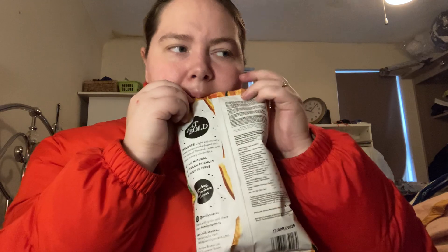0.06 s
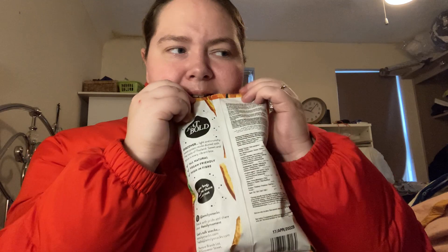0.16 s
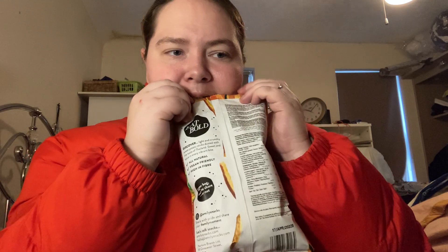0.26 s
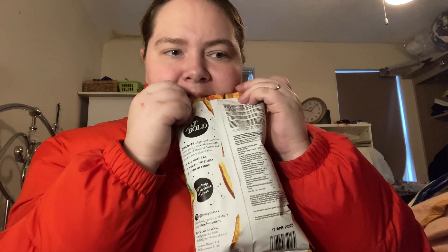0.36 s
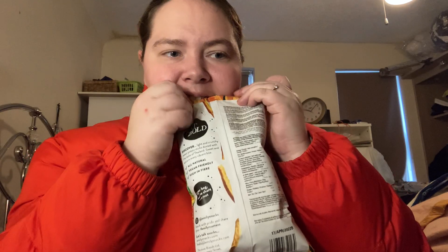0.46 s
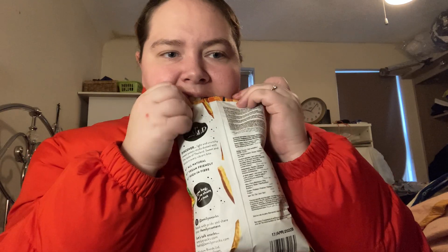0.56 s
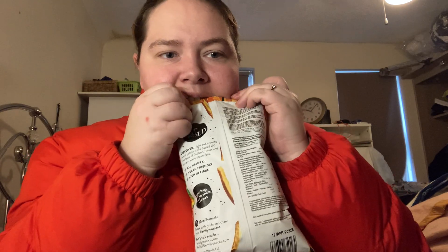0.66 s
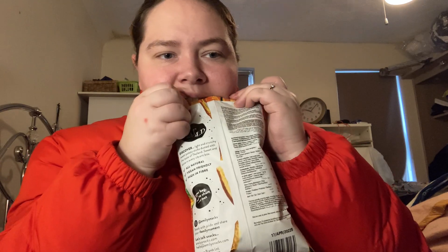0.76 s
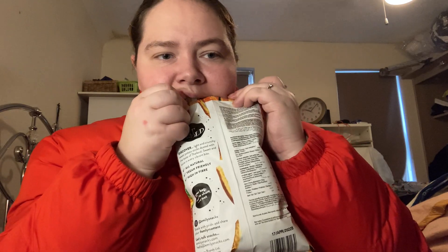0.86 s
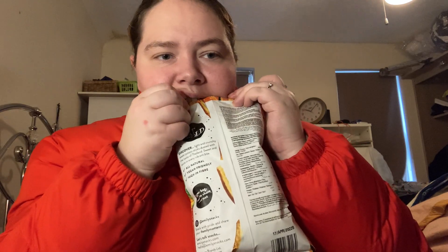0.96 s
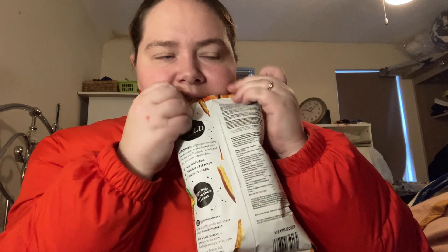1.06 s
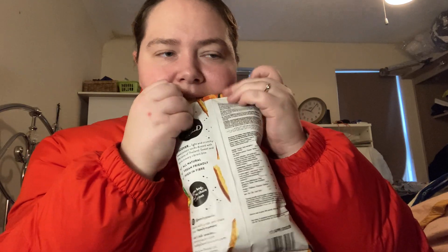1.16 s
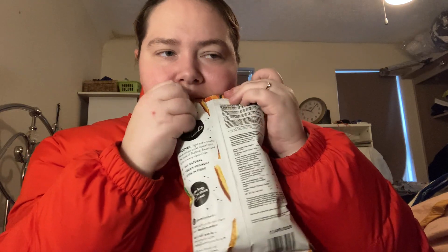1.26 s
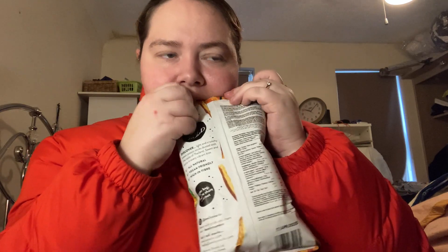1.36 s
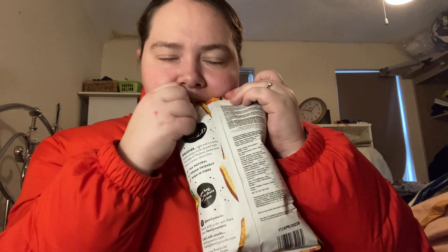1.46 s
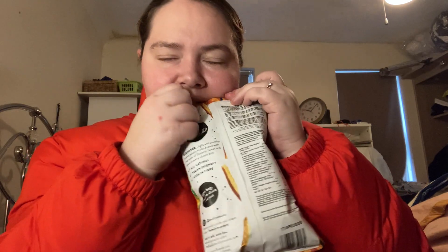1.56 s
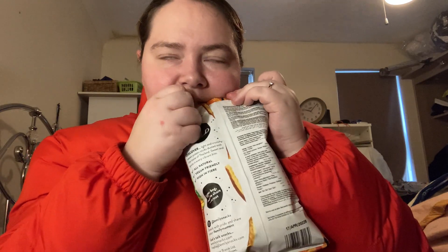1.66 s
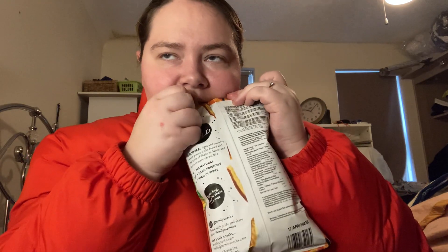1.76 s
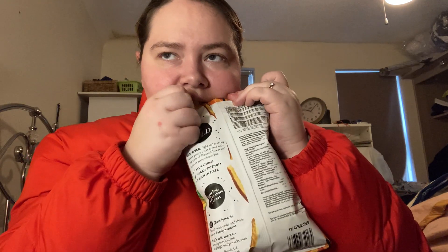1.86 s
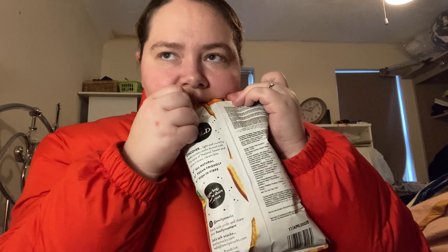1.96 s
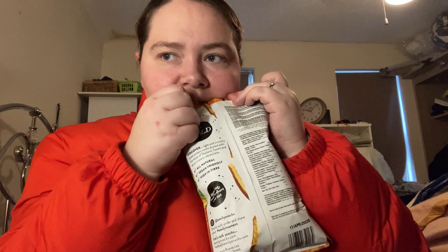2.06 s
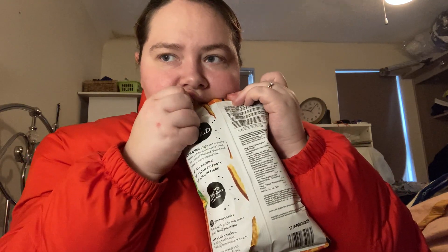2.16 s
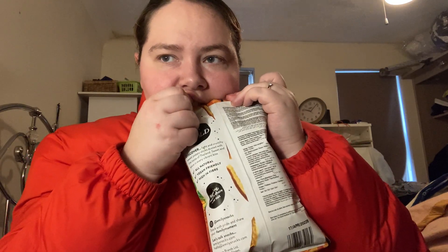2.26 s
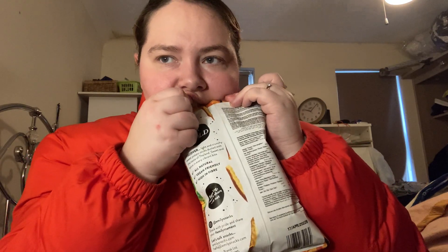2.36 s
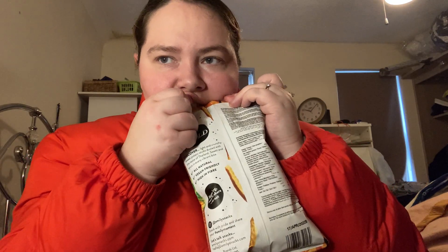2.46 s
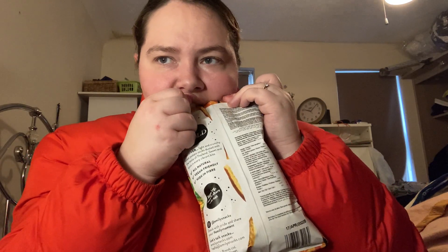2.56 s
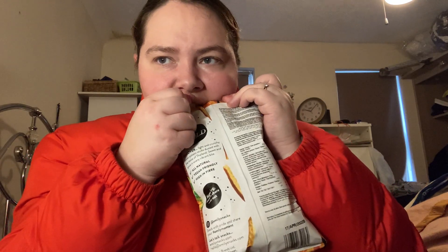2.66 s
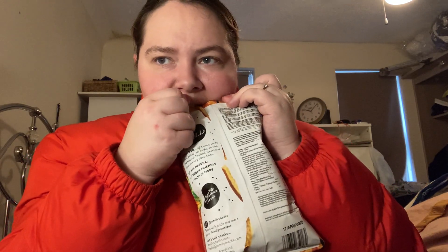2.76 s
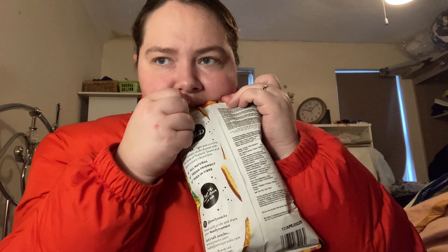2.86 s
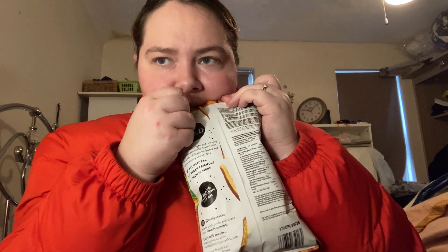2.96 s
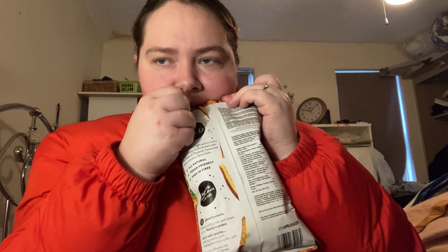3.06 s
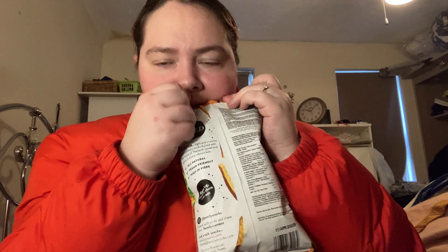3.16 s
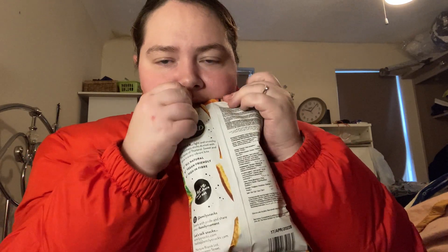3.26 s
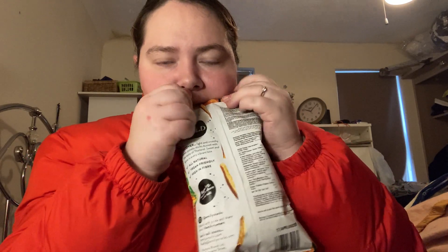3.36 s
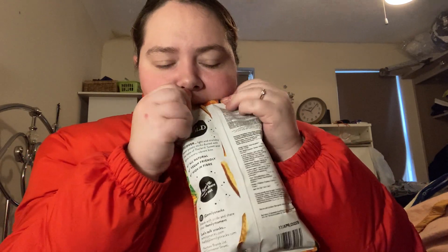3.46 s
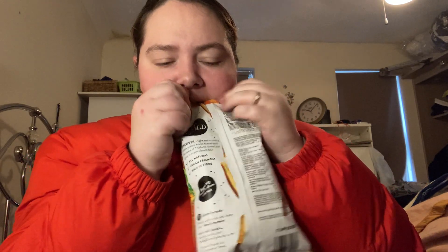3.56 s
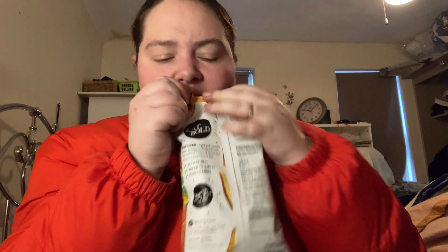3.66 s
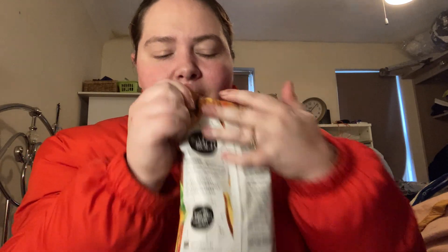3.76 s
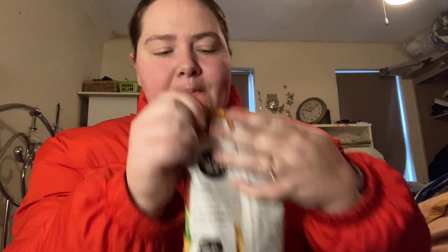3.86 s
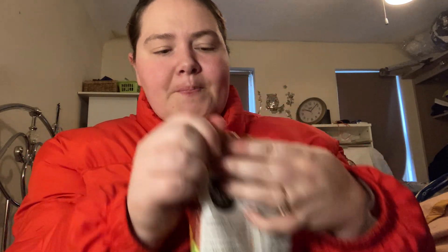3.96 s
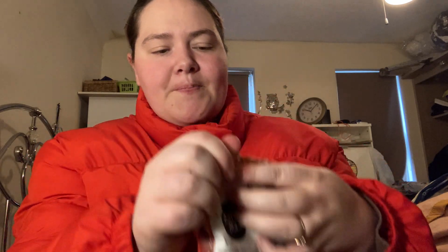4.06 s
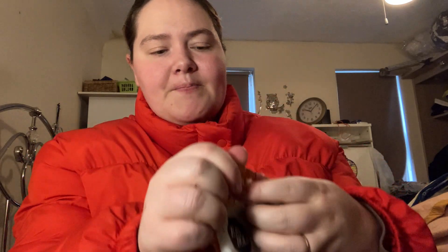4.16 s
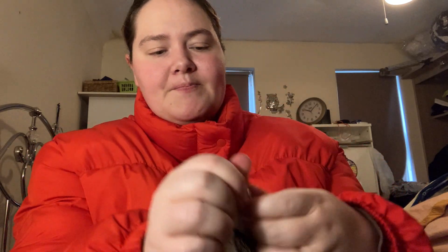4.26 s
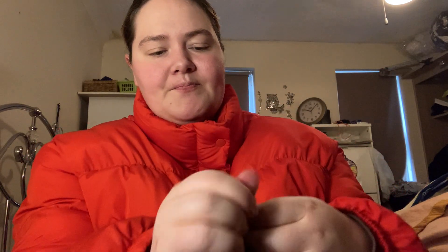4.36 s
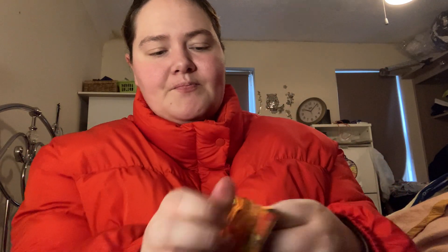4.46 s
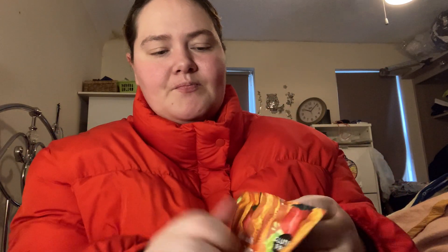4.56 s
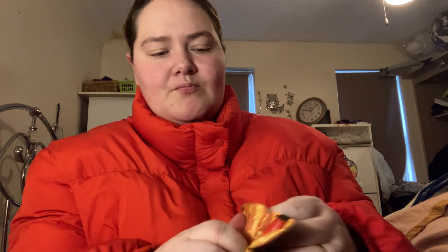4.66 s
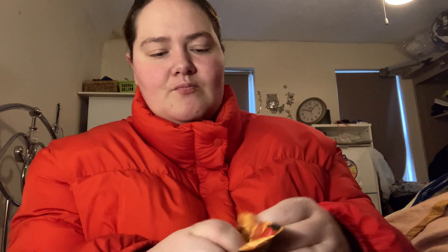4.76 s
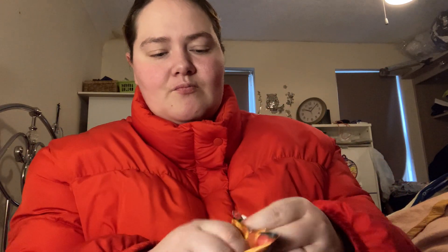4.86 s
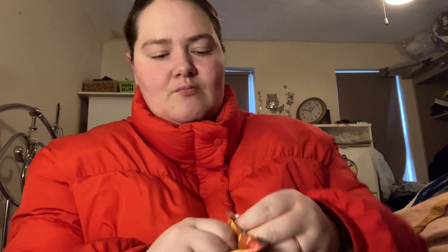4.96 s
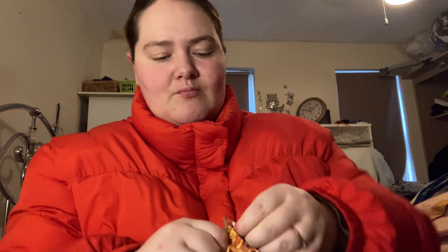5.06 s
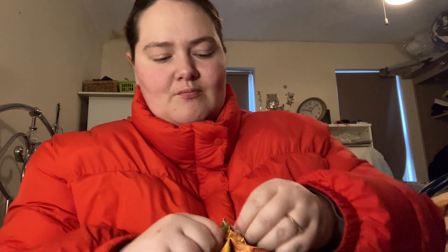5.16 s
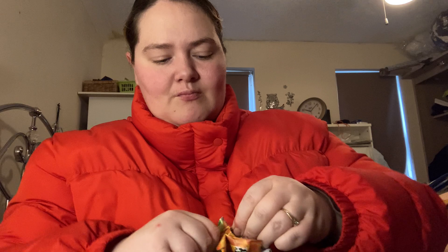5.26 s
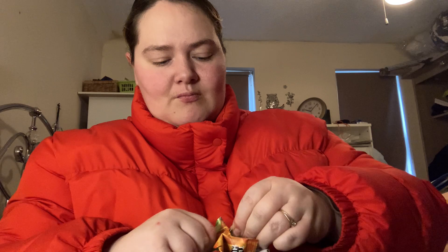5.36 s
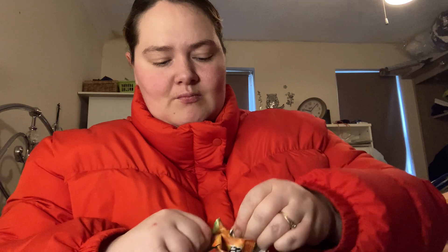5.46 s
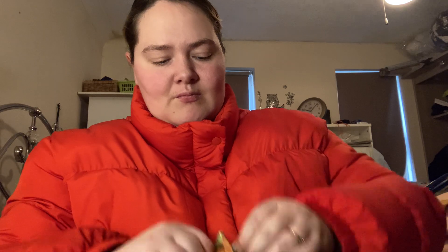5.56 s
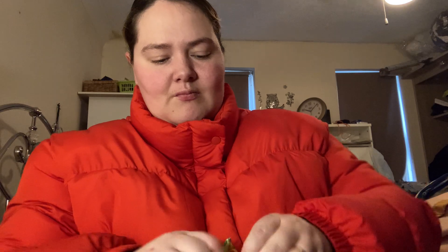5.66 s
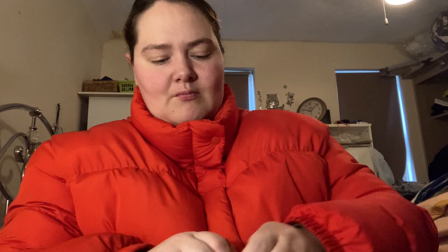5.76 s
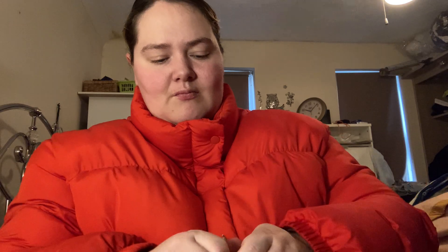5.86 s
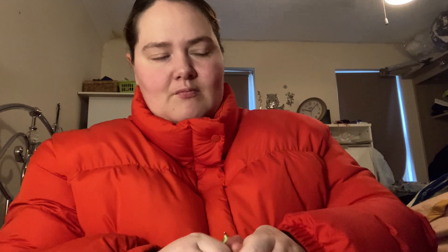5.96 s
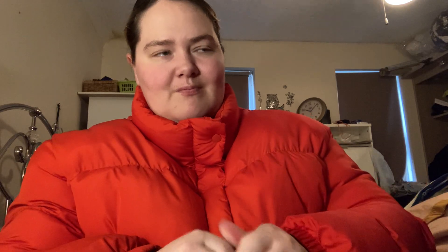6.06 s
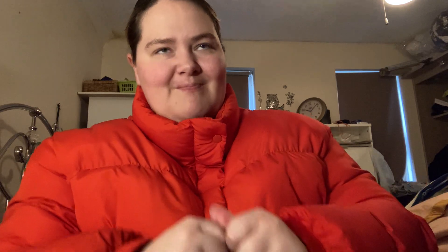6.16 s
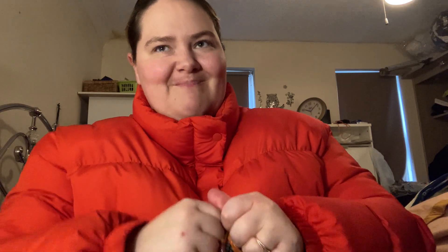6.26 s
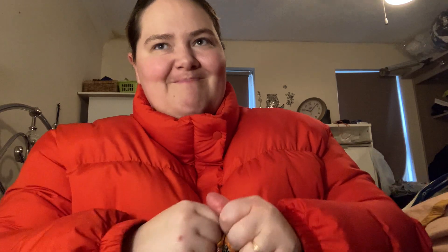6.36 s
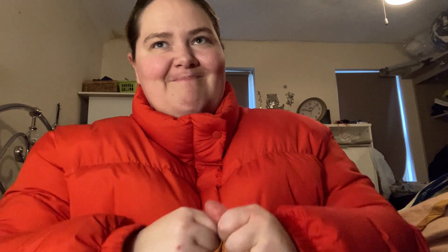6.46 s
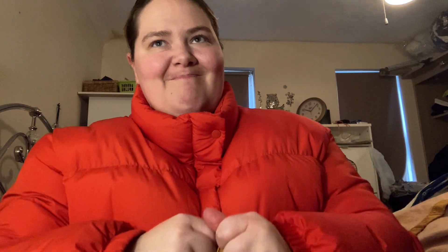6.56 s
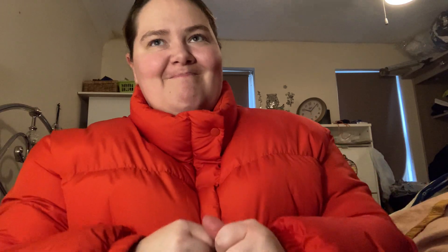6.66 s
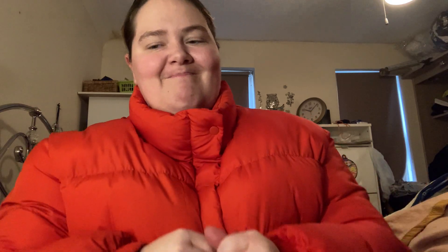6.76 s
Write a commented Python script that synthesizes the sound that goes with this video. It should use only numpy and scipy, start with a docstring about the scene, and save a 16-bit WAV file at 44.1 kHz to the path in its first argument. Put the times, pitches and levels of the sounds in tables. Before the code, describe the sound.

Close to a laptop microphone in a small bedroom, a plastic snack packet held at the mouth gives scattered sharp crackles and light rustle. It falls almost silent for about a second, with only faint ticks, then the crinkling returns and thickens into loud snapping as the hands twist and pull. The bag drums softly low down, over faint rumble and room hum, and the crackling thins at the end.

```python
"""A plastic snack packet crackles in the hands, close to a laptop in a small bedroom.
Creases in its film buckle one by one as damped sines and noise bursts, over a bed of tiny noise grains.
The air-filled bag drums low as damped sines, and decaying noise tails give the answer of the walls.
Two microphone ports colour and phase-shift the sound; shaped noise makes the rumble and faint room hum."""
import sys
import numpy as np
from scipy import signal
from scipy.fft import rfft, irfft, next_fast_len
from scipy.io import wavfile
from scipy.ndimage import map_coordinates

SR = 44100
rng = np.random.default_rng(int(sys.argv[2]) if len(sys.argv) > 2 else 0)


def generate_wav(sig):
    """Save sig (samples, or channels by samples) to the path in sys.argv[1] as 16-bit PCM at SR."""
    pcm = np.round(np.clip(np.atleast_2d(sig).T, -1, 1) * 32767).astype(np.int16)
    wavfile.write(sys.argv[1], SR, pcm)


N = 300782

# Creases that buckle; crack and depth are relative to the peak, and each band adds its own offset:
# start_s, peak_db, pitch_hz, crack_db, depth_db
CREASES = [(0.0024, -24.5, 2050, -10.5, -12.5), (0.0662, -27, 2130, -15.5, -9), (0.116, -47, 1980, -28, -9),
           (0.1419, -34, 1960, -24, -10), (0.2119, -22.5, 2050, -21, -13), (0.2632, -24, 2070, -12, -8.5),
           (0.2746, -36, 2410, -0.5, -10), (0.3202, -32.5, 2500, -7, -3.5), (0.405, -30, 2340, -5, -11.5),
           (0.4195, -44, 2400, -13, -19), (0.4943, -40, 2540, -14, -2), (0.506, -46.5, 2470, 4, -2),
           (0.532, -36.5, 2530, -14, -5.5), (0.5493, -41.5, 2500, -4, 3.5), (0.5801, -33, 2450, -14.5, 3),
           (0.6073, -31, 2370, -13, -12), (0.6267, -35.5, 2440, -17, -10), (0.6545, -30, 2500, -16, -6),
           (0.6817, -26, 2300, -18.5, -8.5), (0.7114, -30.5, 2620, -5.5, -28),
           (0.7963, -21.5, 2180, -17, -24.5), (0.8431, -44, 2520, 11, -5), (0.8699, -32.5, 1940, -20, -3),
           (0.9143, -48, 2470, -23, -25), (1.0727, -41.5, 2020, -27, 5.5), (1.0882, -26.5, 2520, -15.5, -6),
           (1.1118, -24.5, 2000, -13, -7), (1.1343, -32, 1980, -2, -1.5), (1.1742, -35.5, 2460, -7.5, -7.5),
           (1.2101, -36.5, 2420, -7, 1), (1.2414, -18.5, 2430, -9.5, -9.5),
           (1.3194, -34.5, 2600, -9, -31.5), (1.3283, -33.5, 2070, -7.5, -2.5),
           (1.403, -25.5, 2200, -3.5, -7.5), (1.5277, -36, 2580, -39, -7.5),
           (1.5351, -31.5, 2600, -14.5, -31), (1.5571, -28, 2320, -4, -13.5), (1.673, -30, 2210, -1, -9),
           (1.6933, -29, 2690, -15, -10), (1.722, -34.5, 2530, -13, -12), (1.7637, -33.5, 2160, -10.5, -6),
           (1.8233, -41, 1950, -14.5, -0.5), (1.9275, -51.5, 2500, -13, 1.5), (2.007, -48.5, 2480, -21, 6),
           (2.0261, -48, 2280, -31, -3.5), (2.14, -41, 2170, -30, -6.5), (2.2295, -51, 2520, -31, -26),
           (2.3316, -38.5, 2450, -8.5, -2), (2.3491, -33, 2180, -31, -27),
           (2.3978, -20, 2340, -19.5, -32.5), (2.45, -33.5, 2030, -12.5, -5),
           (2.4883, -39.5, 2570, -30, -3), (2.5294, -48, 2600, -29, -33), (2.5713, -48, 2500, -15, -2.5),
           (2.6549, -49.5, 2510, -38, -29), (2.759, -52.5, 2530, -26, -10), (2.772, -59, 2360, -6, -3),
           (2.7915, -48.5, 2440, -21, -8), (2.829, -51, 2480, -30, -32), (2.9126, -54, 1960, -25, 15),
           (2.9307, -29.5, 2250, -13, -8.5), (3.064, -52, 2450, -29, -17), (3.1185, -53, 2400, -36, 1.5),
           (3.1692, -50, 2300, -13.5, 8.5), (3.2052, -27.5, 2460, -27.5, -10),
           (3.256, -31.5, 2640, -21, -9), (3.2815, -25.5, 2010, -13.5, -20), (3.2922, -33, 2040, -8, -2),
           (3.3097, -31.5, 2520, -22, -7.5), (3.3502, -31, 2520, -25, -7.5), (3.3891, -32, 2600, -18, -17),
           (3.4083, -39, 2380, -39, -3.5), (3.472, -31.5, 2490, -5.5, -7.5),
           (3.4897, -35, 2480, -23, -10.5), (3.5471, -29.5, 2680, -22, -6), (3.595, -39, 2590, -23, 1.5),
           (3.6431, -30.5, 2170, -14, -5), (3.6543, -30.5, 2230, -19, -6.5), (3.6727, -25, 2700, -5.5, -8),
           (3.6804, -23, 2060, -28, -26), (3.6919, -27, 2490, -17, -1), (3.7323, -32, 2400, -27, -12.5),
           (3.7698, -23.5, 2420, -12.5, -16), (3.8082, -24, 2480, -16, -7.5),
           (3.8219, -22.5, 2400, -16, -10), (3.8376, -21, 2560, -9, -1), (3.9317, -21, 2570, -13, -12),
           (3.9429, -21.5, 1950, -23, -17), (3.983, -23, 2730, -20.5, -8), (3.9991, -22.5, 2380, -26, -16),
           (4.0296, -22, 2040, -17, -25), (4.093, -27, 2230, -42, -22), (4.1096, -21, 2300, -18, -13),
           (4.136, -26.5, 2250, -40, -13), (4.1629, -21, 2380, -18, -14), (4.2134, -23, 2540, -14.5, -15),
           (4.2241, -14.5, 2280, -13, -27), (4.2391, -15.5, 2660, -15, -13.5),
           (4.2567, -24, 2380, -29, -18), (4.3059, -27.5, 2390, -10, -8.5), (4.3156, -15, 2380, -18.5, -17),
           (4.3488, -21.5, 2450, -12.5, -9), (4.4062, -21, 1930, -13.5, -16),
           (4.4572, -30.5, 2600, -15, -8.5), (4.4732, -23, 2230, -12, -7.5), (4.5191, -30.5, 2060, -8, -3),
           (4.5478, -20, 2540, -13, -11.5), (4.6014, -31, 2390, -3, 4.5), (4.6635, -23, 2600, -15, -3),
           (4.6893, -17, 2220, -12, -18), (4.7015, -20, 3080, -15, -7), (4.7168, -33, 2100, -3, -12),
           (4.7382, -23.5, 2720, -5, -34), (4.7546, -29.5, 1980, -11, -12),
           (4.7743, -21.5, 2500, -14, -19.5), (4.808, -13.5, 2500, -18.5, -23),
           (4.8266, -16, 1930, -16, -32.5), (4.8384, -14.5, 1850, -15, -13), (4.8489, -22, 2700, -4, -12.5),
           (4.8804, -27.5, 2700, -0.5, -20), (4.9008, -18.5, 2840, -7.5, -13),
           (4.9341, -14.5, 2820, -10.5, -13.5), (5.003, -20, 2160, -14, -10.5),
           (5.0447, -29, 2470, -9.5, -10), (5.0595, -21, 2670, -8, -9), (5.0728, -18, 2000, -12, -17.5),
           (5.0849, -19.5, 2640, -12, -15), (5.107, -9, 2710, -16, -16.5), (5.1232, -7, 2850, -14, -30),
           (5.1385, -22.5, 3040, -0.5, -47), (5.1643, -15.5, 2560, -11, -41),
           (5.1933, -17.5, 2540, -23.5, -16), (5.2042, -18, 2620, -31, -16.5),
           (5.2138, -24.5, 2600, -9, -26), (5.2321, -13.5, 2300, -13.5, -19),
           (5.256, -14, 2610, -12.5, -10), (5.2717, -28, 2400, 2.5, -9), (5.2987, -24.5, 2520, -19, -13),
           (5.3342, -25.5, 2380, -10.5, -16), (5.3774, -30, 2480, -16, -10.5),
           (5.4037, -21.5, 2460, -3, -12), (5.4324, -23.5, 2560, -4.5, -13),
           (5.465, -26, 1950, -6.5, -18.5), (5.4971, -15.5, 2960, -19.5, -23),
           (5.5913, -22.5, 2670, -15.5, -26), (5.614, -25, 2430, -26, -11.5), (5.6742, -21, 2530, -12, -13),
           (5.687, -22, 2720, -16, -18), (5.7032, -10.5, 2650, -10.5, -21), (5.75, -24.5, 2290, -4, -4),
           (5.7701, -15.5, 2890, -14, -17), (5.7894, -20.5, 2170, -10, -14.5),
           (5.8055, -16, 2480, -14.5, -14.5), (5.8323, -29, 2000, -5.5, -1),
           (5.8607, -22.5, 2900, -4, -9.5), (5.894, -24, 2940, -20, -9), (5.9513, -22, 2550, -15.5, -14),
           (5.969, -29, 2640, -3.5, -21), (6.0154, -44, 2500, -21, -4.5), (6.036, -24.5, 2400, -11, -30),
           (6.052, -23, 2490, -8.5, -15), (6.087, -23, 2050, -11, -9), (6.097, -21.5, 2060, -6.5, -13),
           (6.129, -26.5, 2620, -8.5, -3), (6.1523, -13.5, 2580, -5, -16), (6.1925, -18, 2010, -25, -17.5),
           (6.2064, -18, 2300, -14, -8), (6.2488, -24, 2630, -8, -8.5), (6.3062, -30.5, 2630, -10.5, -40),
           (6.354, -18, 2660, -15.5, -16.5), (6.4082, -29.5, 2530, -16, -28),
           (6.4195, -24.5, 2800, -8, -22.5), (6.475, -21.5, 2220, -16, -32),
           (6.5051, -25.5, 2020, -16, -24), (6.549, -35, 2460, -10, -18), (6.5923, -32, 2580, -8, -48),
           (6.7121, -21, 2480, -26, -28), (6.7225, -34, 2400, -2, -4), (6.8038, -37, 2820, 3, -2)]


def amp(db):
    """Decibel law: 20 dB is a factor of ten in amplitude."""
    return 10 ** (np.asarray(db) / 20)


def unit(x):
    """Normalization: scale to a root-mean-square of 1 over all channels."""
    return x / np.sqrt(np.mean(x ** 2) + 1e-20)


def along(points, hz):
    """Logarithmic frequency scale: interpolate the value columns of (frequency, value, ..) rows."""
    f, *cols = np.transpose(points)
    return np.array([np.interp(np.log(hz + 1), np.log(f + 1), c) for c in cols])


def filtered(x, response):
    """Linear filtering: multiply the spectrum by a response of frequency."""
    m = next_fast_len(N + SR // 2, real=True)  # half a second of padding
    spectrum = rfft(x, m) * response(np.fft.rfftfreq(m, 1 / SR))
    return irfft(spectrum, m)[..., :N]


def band(x, lo_hz, hi_hz):
    """Band limitation: causal Butterworth band-pass."""
    sos = signal.butter(3, [lo_hz, hi_hz], "band", fs=SR, output="sos")
    return signal.sosfilt(sos, x)


def placed(times, shapes):
    """Superposition: rows of short sounds summed at their start times in seconds."""
    first = np.round(np.asarray(times) * SR).astype(int)
    at = first[:, None] + np.arange(shapes.shape[1])
    return np.bincount(at.ravel(), shapes.ravel(), N + SR)[:N]


def ping(db, hz, cycles, size):
    """Damped resonance: sines that fall 60 dB in so many cycles, with a soft start."""
    turns = np.outer(hz, np.arange(size) / SR)
    decay = amp(np.asarray(db)[:, None] - 60 * turns / cycles)
    return decay * np.sin(2 * np.pi * turns) * (1 - np.exp(-turns / 0.3))


def burst(db, t60, rise, size):
    """Transient noise: puffs that swell over rise seconds and decay 60 dB per t60 seconds."""
    t = np.arange(size) / SR
    decay = amp(np.asarray(db)[:, None] - 60 * t / t60)
    swell = (1 - np.exp(-t / rise)) ** 2
    return decay * swell * rng.standard_normal((len(db), size))


def struck(s, db, shapes, lo_hz, hi_hz, apart):
    """Partial coherence: each band-passed row at its peak level, with a share that differs at the right."""
    rows = band(shapes, lo_hz, hi_hz)
    rows = rows / np.abs(rows).max(axis=1)[:, None]
    # Creases lie all over the bag: the right port mixes in the neighbouring row by an angle in radians
    right = np.cos(apart) * rows + np.sin(apart) * np.roll(rows, 1, axis=0)
    return np.array([placed(s, amp(db)[:, None] * side) for side in (rows, right)])


def snaps():
    """Buckling instability: each crease pings, cracks in the treble, knocks the film and drums the bag."""
    s, db, hz, crack_db, depth_db = np.transpose(CREASES)
    even = 0 * s  # equal levels ahead of the peak scaling

    tone = ping(even, hz, cycles=16.9, size=700)
    tone = tone + burst(even - 8, t60=0.036, rise=0.000083, size=700)

    # One larger facet of film rings in the knock; pitches scatter on a log scale
    knock_hz = 1049 * np.exp(0.292 * rng.standard_normal(len(s)))
    knock = burst(even - 3, t60=0.078, rise=0.00054, size=1200)
    knock = knock + ping(even, knock_hz, cycles=19, size=1200)

    # Two small facets ring under the noise of the crack
    facets_hz = 5420 * np.exp(0.291 * rng.standard_normal((len(s), 2)))
    crack = burst(even - 4, t60=0.027, rise=0.00017, size=700)
    for facet_hz in facets_hz.T:
        crack = crack + ping(even - 4, facet_hz, cycles=20, size=700)

    drum = burst(even, t60=0.045, rise=0.0009, size=2400)
    return (struck(s, db - 0.4, tone, 1260, 3620, apart=0.18)
            + struck(s, db + crack_db + 17, crack, 3170, 16000, apart=0.9)
            + struck(s, db + depth_db + 2, knock, 698, 1750, apart=0.61)
            + struck(s, db + depth_db - 2.5, drum, 122, 624, apart=0.17))


def grains(count, spread_db, t60, apart):
    """Random point process: tiny creases of bounded size, partly different at the two ports."""
    draw = rng.random((count, 2))
    start_s = draw[:, 0] * N / SR
    size_db = spread_db * draw[:, 1] ** 2
    both, own = [placed(start_s, burst(size_db, t60, rise=0.00049, size=300)) for _ in range(2)]
    return np.array([both, np.cos(apart) * both + np.sin(apart) * own])


def unrest(s, db, before_s, after_s):
    """Exponential relaxation: gain of small creases that gather before a snap and settle after it."""
    lead = 400  # samples of gathering
    t = np.arange(-lead, 3000) / SR
    shape = np.where(t < 0, np.exp(t / before_s), np.exp(-t / after_s))
    return np.roll(placed(s, amp(db)[:, None] * shape), -lead)


def crackle():
    """Granular noise: many small creases follow the grip of the fingers and gather around every snap."""
    # How hard the fingers work the film: time_s, grip_db
    hands = [(0.0, -57), (0.47, -64), (0.72, -67), (0.85, -74), (1.12, -66.5), (1.25, -52.5), (2.18, -83),
             (2.49, -65.5), (2.79, -79.5), (3.17, -73.5), (3.38, -64), (4.16, -43), (4.56, -48.5),
             (4.92, -32.5), (5.07, -56.5), (5.57, -57.5), (5.68, -52), (5.83, -60), (6.02, -42.5),
             (6.34, -50.5), (6.51, -70), (6.82, -46.5)]
    grip_db = np.interp(np.arange(N) / SR, *np.transpose(hands))
    extra_db = grip_db + 51  # relative to a middling grip of -51 dB

    fine = grains(count=2400, spread_db=13.5, t60=0.0064, apart=0.84)
    # Some creases only tick in the treble
    thin = unit(fine) + 0.92 * unit(grains(count=1500, spread_db=19, t60=0.0061, apart=0.95))
    slow = unit(fine) + 1.7 * unit(grains(count=900, spread_db=11.5, t60=0.0042, apart=0.19))

    at, db, _, crack_db, depth_db = np.transpose(CREASES)
    # A snap above -24.5 dB stirs up more small creases, one below it fewer
    db = db + 0.21 * (db + 24.5)
    mid = amp(grip_db - 3.5) + unrest(at, db - 19.5, before_s=0.0028, after_s=0.0075)
    # Treble and low rustle each grow at their own rate, in dB per dB of grip
    bright = amp(-50 + 1.16 * extra_db) + unrest(at, db + crack_db - 7, before_s=0.0098, after_s=0.008)
    low = amp(-53 + 0.83 * extra_db) + unrest(at, db + depth_db - 10.5, before_s=0.018, after_s=0.017)
    return (mid * unit(band(fine, 1860, 2945))
            + bright * unit(band(thin, 1980, 16000))
            + low * unit(band(slow, 90, 1960)))


def pops():
    """Membrane resonance: the wall of the air-filled bag flips in or out and rings for a few cycles."""
    # Flips of the wall: start_s, level_db, pitch_hz
    flips = [(0.067, -49, 392), (0.212, -34.5, 424), (0.58, -32, 305), (0.681, -26.5, 312),
             (0.871, -46, 483), (1.014, -46, 360), (1.086, -27.5, 322), (1.21, -30, 402), (1.527, -39, 300),
             (1.679, -44.5, 437), (1.762, -36, 317), (1.824, -34.5, 486), (2.009, -32.5, 455),
             (2.331, -36.5, 470), (2.574, -36, 456), (2.932, -33.5, 449), (3.172, -39.5, 315),
             (3.47, -42, 464), (3.659, -28, 273), (3.819, -29.5, 290), (3.934, -47, 490), (4.23, -60, 424),
             (4.51, -29.5, 380), (4.548, -28.5, 372), (4.677, -21.5, 279), (4.838, -37.5, 418),
             (4.892, -34, 302), (5.001, -33, 230), (5.06, -29, 259), (5.109, -31, 347), (5.197, -32, 433),
             (5.268, -27, 271), (5.301, -27, 430), (5.499, -32.5, 283), (5.677, -38, 360),
             (5.749, -24, 382), (6.118, -24, 262), (6.208, -23, 420), (6.355, -37, 480), (6.778, -36, 400)]
    s, db, hz = np.transpose(flips)
    return placed(s, ping(db + 0.5, hz, cycles=14.7, size=3000))


def walls(x):
    """Reverberation: noise tails decay at a rate set by frequency, with the bass alike at both ports."""
    # Decay of the room: frequency_hz, t60_s
    decays = [(200, 0.22), (600, 0.2), (1500, 0.15), (4000, 0.21), (9000, 0.2)]
    out, step = np.zeros((2, N + SR)), SR // 4
    delay = 150  # samples before the walls answer
    # The packet moves, so each quarter second draws a new answer
    for i in range(0, N, step):
        hz, t, z = signal.stft(rng.standard_normal((2, SR // 3)), SR, nperseg=256)
        alike = 1 / (1 + (hz[:, None] / 450) ** 2)
        z[1] = alike * z[0] + np.sqrt(1 - alike ** 2) * z[1]
        decay = amp(-60 * t / along(decays, hz)[0][:, None])
        tail = signal.istft(z * decay, SR, nperseg=256)[1]
        tail = tail / np.linalg.norm(tail[0])
        answer = signal.fftconvolve(x[None, i:i + step], tail, axes=1)
        start = i + delay
        out[:, start:start + answer.shape[1]] += answer
    return out[:, :N]


def microphones(x):
    """Minimum-phase filtering: each port has its own colour, and the right takes a set phase lag."""
    # Port colours in the laptop body: frequency_hz, left_db, right_db
    colours = [(99, -3, -5.5), (249, -1.5, 1), (472, 7, -2), (706, -8.5, 2.5), (797, 3, -2.5),
               (1554, -7, -4.5), (1574, -13.5, -13.5), (2016, -3, -1), (2570, 0, 1), (3380, -6, -3.5),
               (3410, 0.5, -13), (4660, -5.5, -8), (7290, -9, -17), (9950, -35.5, -34),
               (11400, -49.5, -49.5), (12600, -43, -44), (14800, -62, -53)]
    # Phase by which the left port leads: frequency_hz, lead_rad
    leads = [(60, -0.5), (120, -0.7), (300, -0.1), (500, 0.7), (720, 4.0), (1000, 5.0), (1250, 3.9),
             (1500, 5.2), (1700, 8.0), (2200, 5.2), (2800, 6.4), (3350, 8.4), (3700, 11.6), (4300, 12.4),
             (5100, 17.2), (6800, 19.5), (7700, 23.1), (9000, 25.2), (10000, 27.2)]

    def response(hz):
        """Cepstral folding: derive minimum phase from the magnitude alone."""
        cep = irfft(np.log(amp(along(colours, hz))))
        half = cep.shape[1] // 2
        folded = np.concatenate([cep[:, :1], 2 * cep[:, 1:half], 0 * cep[:, half:]], axis=1)
        colour = np.exp(rfft(folded))
        # Replace the phase between the ports by the tabled lead
        turn = np.angle(colour[0] / colour[1]) - np.interp(hz, *np.transpose(leads))
        return colour * np.array([1 + 0 * turn, np.exp(1j * turn)])
    return filtered(x, response)


def rumble():
    """Amplitude-modulated noise: low rumble of the house and of arms on the desk swells and fades."""
    # Slow course of the rumble, before an offset: time_s, level_db
    swells = [(0, -70), (.6, -65), (1.4, -64), (2.1, -60), (2.9, -64.5), (3.45, -71), (3.67, -52.5),
              (4.2, -58.5), (4.8, -55), (5.4, -64), (6.1, -58), (6.82, -66)]
    low, other = band(rng.standard_normal((2, N)), 25, 91)
    # Smooth random lumps, seven points a second
    lumps_db = 2.5 * map_coordinates(rng.standard_normal(60), [np.arange(N) * 7 / SR])
    level_db = np.interp(np.arange(N) / SR, *np.transpose(swells)) + lumps_db - 5
    pair = unit(np.array([low + 0.45 * other, low - 0.45 * other]))
    sides_db = np.array([[1.1], [-1.1]])  # left a little louder
    return amp(level_db + sides_db) * pair


def room_hum():
    """Spectral shaping: two steady noises, mixed differently at each port, make the faint room hum."""
    # Relative noise spectrum of the room: frequency_hz, density_db
    spectrum = [(65, -15), (110, -12), (146, -10), (351, 5), (475, 8), (669, 1), (907, -17.5),
                (1120, -22.5), (1730, -33.5), (2490, -14), (3430, -21.5), (10300, -22.5), (11300, -56.5),
                (13000, -20.5), (15000, -45)]
    a, b = filtered(rng.standard_normal((2, N)), lambda hz: amp(along(spectrum, hz)[0]))
    return amp(-71) * unit(np.array([a + 0.79 * b, a - 0.28 * b]))


def scene():
    """Superposition: the packet, direct and off the walls, through the ports, over rumble and hum."""
    packet = snaps() + crackle() + pops()
    reflected = amp(-7.5) * walls(packet[0])
    return microphones(packet + reflected) + rumble() + room_hum()


def record(dry):
    """Band limitation: the ports drop the deepest bass, and nothing from 15200 Hz up is kept."""
    return filtered(dry, lambda hz: (hz < 15200) / np.sqrt(1 + (37 / (hz + 1)) ** 16))


dry = scene()
out = record(dry)
generate_wav(out)
```